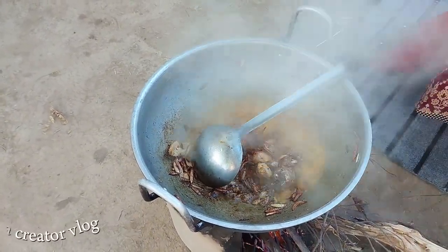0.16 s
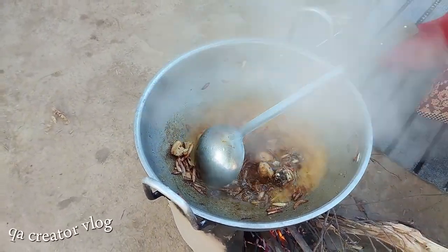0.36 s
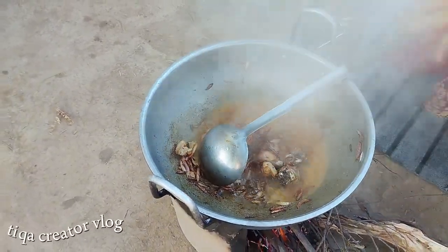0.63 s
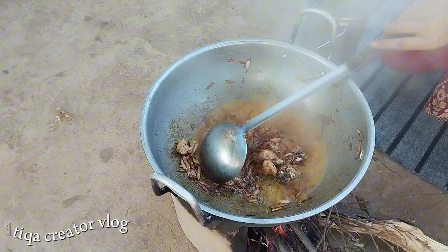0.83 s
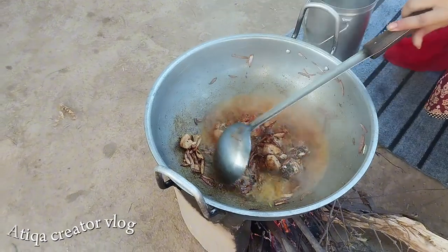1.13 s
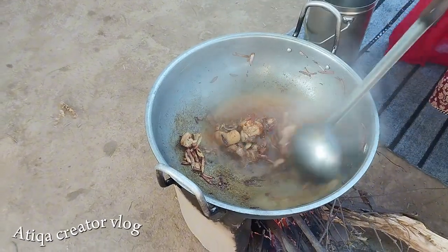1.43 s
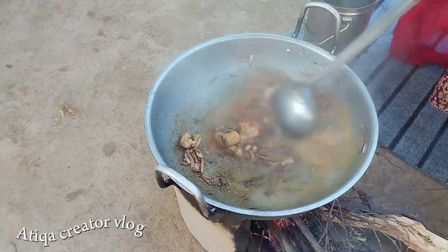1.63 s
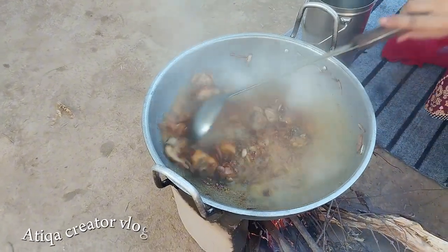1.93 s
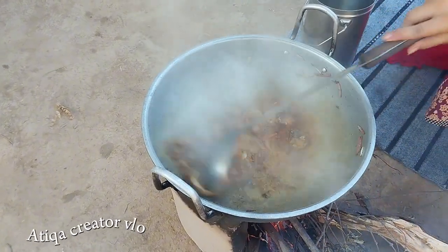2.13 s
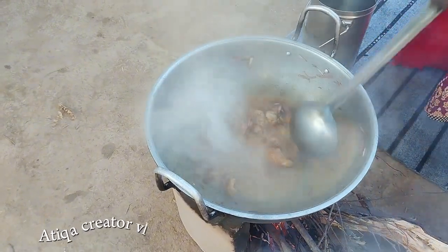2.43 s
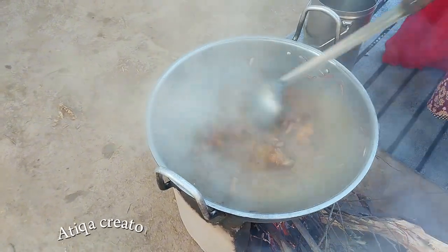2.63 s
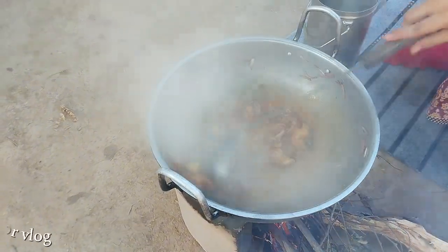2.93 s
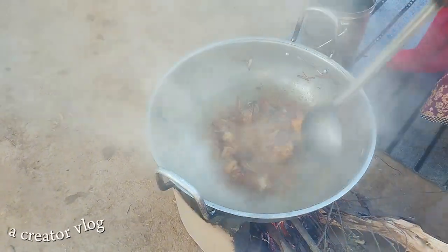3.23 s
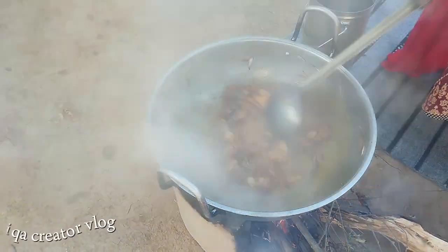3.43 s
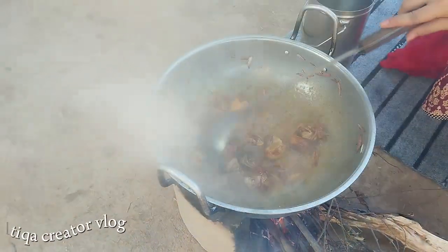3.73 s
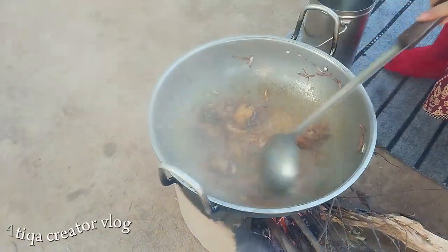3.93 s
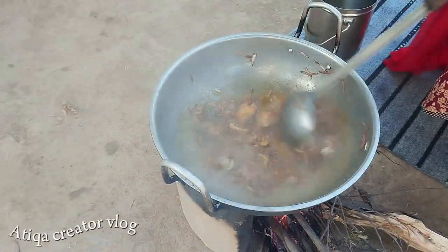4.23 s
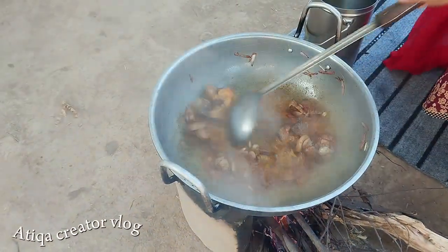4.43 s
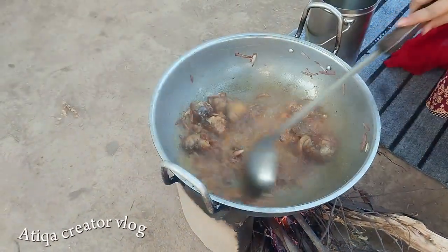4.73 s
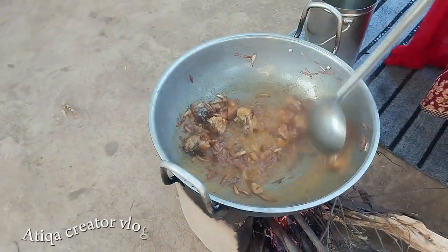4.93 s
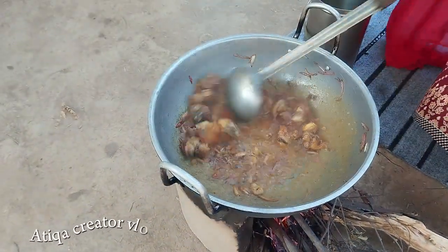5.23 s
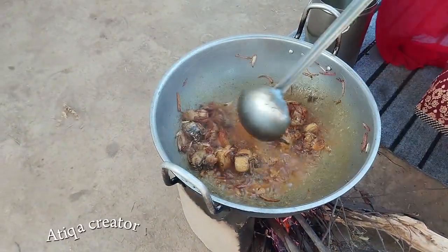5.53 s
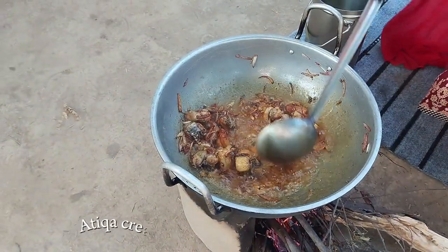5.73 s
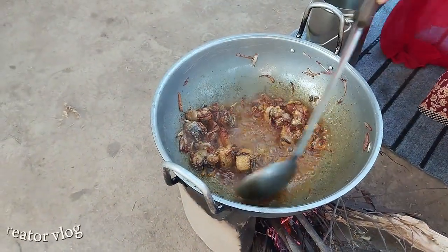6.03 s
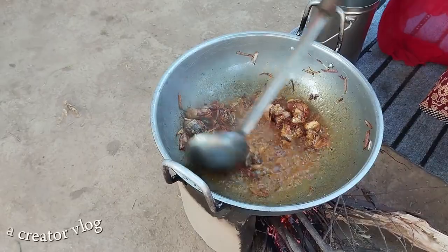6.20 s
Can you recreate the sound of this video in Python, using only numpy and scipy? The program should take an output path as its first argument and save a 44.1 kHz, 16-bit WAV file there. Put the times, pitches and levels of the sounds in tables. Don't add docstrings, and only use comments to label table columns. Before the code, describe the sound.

Loud steamy sizzling in a wide metal pan outdoors, surging with sharp spits, then easing as a ladle scrapes and knocks the pan.

```python
import sys
import numpy as np
from scipy import signal
from scipy.fft import rfft, irfft, next_fast_len
from scipy.io import wavfile
from scipy.ndimage import uniform_filter1d

SR = 44100
rng = np.random.default_rng(int(sys.argv[2]) if len(sys.argv) > 2 else 0)


def to_wav(s):
    ch = np.atleast_2d(s).T
    pcm = np.round(np.clip(ch, -1, 1) * 32767)
    wavfile.write(sys.argv[1], SR, pcm.astype(np.int16))


def natural_amplitude(level_db):
    exponent = np.asarray(level_db, float) / 20
    return 10 ** exponent


N = 280558
EDGE_HZ = 15740

# pitch_hz, width_hz, level_db
PAN = [(285, 50, 6.5), (420, 93, 1.5), (505, 230, 2.5), (730, 100, -7), (1010, 34, -3.5), (1480, 39, -8),
       (1880, 100, -21)]


def evened(x):
    return x / np.sqrt(np.mean(x ** 2) + 1e-20)


def curve(rows, column, t):
    rows = np.asarray(rows)
    return np.interp(t, rows[:, 0], rows[:, column])


def resonate(x, hz, width):
    r = np.exp(-np.pi * width / SR)
    return signal.lfilter([1 - r, 0, r - 1], [1, -2 * r * np.cos(2 * np.pi * hz / SR), r * r], x)


def modes(x, table):
    return sum(natural_amplitude(db) * resonate(x, hz, width) for hz, width, db in table)


def noise(shape, size, patchy_db, flicker_db, band_hz):
    frames = 4 * N // size + 5
    hz = np.fft.rfftfreq(size, 1 / SR)
    a, b, patches = rng.standard_normal((frames, len(hz), 3)).T
    patches = uniform_filter1d(patches, size // 64, 0)
    patches = evened(uniform_filter1d(patches, 8192 // size, 1))
    flicker = evened(uniform_filter1d(rng.standard_normal(frames), size=3))
    shape_hz, shape_db = np.transpose(shape)
    gain = natural_amplitude(np.interp(np.log(hz + 1), np.log(shape_hz + 1), shape_db, -90, -90))
    spectra = (a + 1j * b) * gain[:, None] * natural_amplitude(patchy_db * patches + flicker_db * flicker)
    x = evened(signal.istft(spectra, nperseg=size, noverlap=3 * size // 4)[1][:N])
    inside = (hz > band_hz[0]) & (hz < band_hz[1])
    return x * np.sqrt((gain ** 2).sum() / (gain[inside] ** 2).sum())


def spit(per_s, spread_db, ms):
    strength = natural_amplitude(spread_db * np.minimum(rng.exponential(1, N), 4))
    bursts = strength * (rng.random(N) < per_s / SR)
    return signal.lfilter([1], [1, -np.exp(-1000 / (ms * SR))], bursts)


def surges(t):
    # start_s, swell_s, hold_s, level_db
    flares = [(0.0, 0.021, 0.029, 1.5), (.15, 0.15, .12, 1.5), (.42, .06, .1, 1.7), (0.66, 0.055, 0.1, 4),
              (0.913, 0.15, 0.24, 4), (1.0, 0.11, 0.16, -1), (1.038, 0.11, .01, 3), (1.46, 0.024, 0.052, 3),
              (1.58, .15, .06, 3), (1.87, 0.1, 0.027, 6), (2.04, 0.028, 0.28, 1.5), (2.402, 0.069, 0.35, 4),
              (2.5, .08, 0.19, 1), (2.848, 0.044, 0.18, 3.5), (3.14, 0.17, .1, 2), (3.534, .02, 0.49, 2.5),
              (3.615, .2, .1, 1.5), (5.34, .03, 0.056, 1), (5.683, .06, 0.017, 1), (6.306, .04, .05, 3)]
    settle_s = 0.074
    total_db = 0
    for s, swell, hold, db in flares:
        rise = (t - s) / swell
        fall = 1 + (s + swell + hold - t) / settle_s
        total_db = total_db + db * np.clip(np.minimum(rise, fall), 0, 1)
    return total_db


def boiling(t):
    # pitch_hz, level_db (per Hz)
    fizz_shape = [(1180, -45), (2000, -15), (2850, -2), (3080, -1), (4260, -1), (5100, -0.5), (6740, 0),
                  (7400, -7), (9620, -38), (16300, -120)]
    # pitch_hz, level_db (per Hz)
    bubble_shape = [(88, -58), (150, -6.5), (217, -22.5), (279, -14), (354, -13), (538, -5), (691, -5.5),
                    (779, -9.5), (1020, -3.5), (1140, -4), (1630, -4), (1820, -3), (2120, -3.5),
                    (2600, -1.5), (3380, -37), (5720, -120)]
    # pitch_hz, level_db (per Hz)
    mist_shape = [(6800, 2.5), (7700, 7), (8600, 4.5), (9500, 5), (11400, -1.5), (12900, -6.5), (14000, -4),
                  (15700, 5), (17000, -25)]
    # time_s, heat_db, pool_db
    heat = [(0.0, -31.5, -9.5), (0.9, -33, -10.5), (1.5, -32, -9.5), (1.98, -32, -10.5), (2.06, -32, -14.5),
            (2.4, -34, -11.5), (2.8, -34, -11), (3.3, -34.5, -14), (3.7, -34.5, -11), (4.15, -32.5, -14),
            (4.8, -33.5, -12), (5.6, -37.5, -11.5), (6.36, -41, -9)]
    # middle_s, half_length_s, loss_db
    shades = [
        (0.0, .03, 1),
        (.89, 0.09, 3.5),
        (1.24, .08, 3.5),
        (1.437, .07, 6),
        (1.602, .08, 0),
        (2.401, 0.09, 1),
        (4.65, 0.11, 1.5),
        (3.525, 0.054, 1.5),
        (6.098, .5, 2),
        (6.277, 0.1, 5.5),
    ]
    heat_db, pool_db, flare_db = curve(heat, 1, t), curve(heat, 2, t), surges(t)
    shade_db = sum(db * np.clip(1 - abs(t - s) / half, 0, 1) for s, half, db in shades)

    drops = spit(per_s=98, spread_db=-4.5, ms=1.7)
    fizz = noise(fizz_shape, size=256, patchy_db=0.51, flicker_db=0.38, band_hz=(2500, 9000))
    fizz *= evened(1 + 0.43 * drops)
    low = noise(bubble_shape, size=1024, patchy_db=0.98, flicker_db=-1.05, band_hz=(1100, 2400))
    low *= evened(1 + 0.16 * drops)
    mist = noise(mist_shape, size=256, patchy_db=1.13, flicker_db=0.34, band_hz=(10500, 15500))
    mist *= evened(1 + 0.12 * drops)

    fizz_db = heat_db + flare_db
    low_db = heat_db + pool_db + 0.63 * flare_db
    mist_db = -40.5 + 0.35 * (heat_db - heat[0][1]) + 0.3 * flare_db - shade_db
    mist_db = mist_db - 0.24 * (pool_db - heat[0][2])
    return natural_amplitude(fizz_db) * fizz + natural_amplitude(low_db) * low + natural_amplitude(mist_db) * mist


def bowl(steam):
    # pitch_hz, width_hz, level_db
    pan_tones = [(510, 120, -5.5), (1030, 28, 0), (1859, 27, 5), (2650, 240, -16.5), (3092, 62, 3.5),
                 (3630, 200, -1.5), (4240, 87, 1)]
    return natural_amplitude(-1.13) * (steam + natural_amplitude(-6.0) * modes(steam, pan_tones))


def wind(t):
    # time_s, level_db
    strength = [(0.0, -57), (0.51, -58.5), (1.45, -52), (1.9, -57), (2.69, -54), (3.2, -57.5), (4.3, -50),
                (4.5, -43), (4.78, -36.5), (4.89, -34), (5.17, -36), (6.36, -38)]
    # pitch_hz, level_db (per Hz)
    rumble_shape = [(8.8, -30), (15, 14.5), (43, -5), (88, -7.5), (124, -12), (162, -14.5), (269, -25.5),
                    (400, -27.5), (520, -22), (880, -120)]
    # time_s, peak_db, width_ms, way (push +1 or pull -1)
    lumps = [(4.07, -43, 13, 1), (4.165, -36.5, 11, 1), (4.716, -26.5, 6.2, 1), (4.758, -40.5, 5.8, 1),
             (4.785, -29, 12.5, 1), (4.811, -26.5, 4.3, 1), (4.832, -25.5, 5.6, 1), (4.934, -20.5, 6.1, 1),
             (5.014, -42, 13, 1), (5.058, -40, 12, -1), (5.076, -26, 7.3, 1), (5.111, -29, 9.5, 1),
             (5.216, -28, 11, -1), (5.323, -24.5, 13, -1), (5.43, -28, 15.5, -1), (5.526, -36, 6.7, -1),
             (5.547, -27.5, 8.8, -1), (5.702, -27, 6.3, 1), (5.732, -20, 9.8, 1), (5.912, -26, 14, -1),
             (5.94, -26.5, 11, -1), (6.045, -31, 17, -1), (6.173, -24, 5.5, 1)]
    rumble = noise(rumble_shape, size=4096, patchy_db=0.15, flicker_db=0.0, band_hz=(20, 140))
    out = natural_amplitude(curve(strength, 1, t) + 1.5) * rumble
    for s, db, ms, way in lumps:
        near = slice(round((s - 0.06) * SR), round((s + 0.06) * SR))
        u = (t[near] - s) * 2500 / ms
        out[near] += np.sign(way) * natural_amplitude(db) * (1 - 1.25 * u ** 2) * np.exp(-u ** 2 / 2)
    return out


def spats():
    # time_s, peak_db
    big_drops = [(0.7507, -21), (0.9448, -13), (1.0222, -8), (1.1023, -19), (1.147, -13), (1.477, -21),
                 (1.595, -11), (3.3023, -26), (3.549, -23), (5.371, -16.5), (5.6191, -27), (5.677, -24),
                 (6.067, -17.5)]
    out, t = np.zeros(N + 512), np.arange(512) / SR
    for s, db in big_drops:
        grit = rng.standard_normal(512)
        burst = resonate(grit, 4200, 4100) * np.exp(-t / 0.003)
        out[round(s * SR):][:512] += natural_amplitude(db - 6.5) * burst / abs(burst).max()
    return out[:N]


def wall(force, pitch_hz, focus):
    out = 0
    for hz, width, db in PAN:
        swing = resonate(resonate(force, hz, width), hz, 1.05 * width)
        out = out + natural_amplitude(db - focus * abs(np.log2(hz / pitch_hz))) * swing
    return out


def scraping(t):
    # start_s, length_s, drag_db
    strokes = [
        (1.3, 0.2, -47.5),
        (1.46, .3, -54),
        (1.75, 0.2, -49),
        (1.96, 0.16, -56),
        (4.33, 0.337, -42.5),
        (4.922, .07, -39),
        (5.154, 0.08, -43),
        (5.213, 0.068, -32),
        (5.269, 0.056, -30.5),
        (5.307, 0.16, -35),
    ]
    bite, lift_s, tire_db = 0.16, 0.026, -3.5
    strength = natural_amplitude(2.1 * np.minimum(rng.exponential(1, N), 4))
    slips = strength * (rng.random(N) < 500 / SR) * rng.choice([-1, 1], N)
    push = 0
    for s, length, db in strokes:
        sag_db = tire_db * np.clip((t - s) / length, 0, 1)
        press = np.minimum((t - s) / (bite * length), (s + length - t) / lift_s)
        push = push + natural_amplitude(db + sag_db) * np.clip(press, 0, 1)
    return natural_amplitude(-0.4) * push * evened(wall(slips, 336, focus=4.0))


def blows(rows, tick):
    out, t = np.zeros(N + 4096), np.arange(4096) / SR
    mode_hz, _, mode_db = np.transpose(PAN)
    for (s, db, hz, ms), chance in zip(rows, rng.random((len(rows), 2, 8))):
        tones = np.append(mode_hz, hz) * (0.962 + 0.051 * chance[0])
        tones_db = np.append(mode_db - 10.7 * abs(np.log2(mode_hz / hz)), 1.5)
        ring = natural_amplitude(tones_db) @ np.sin(2 * np.pi * (np.outer(tones, t) + chance[1, :, None]))
        ring *= np.sin(np.pi / 2 * np.minimum(t * 1000 / (0.14 * ms), 1))
        ring *= natural_amplitude(-60 * np.maximum(t - 0.35 * ms / 1000, 0) / 0.043)
        partials = np.sin(2 * np.pi * hz * t)
        partials += 0.9 * np.sin(2 * np.pi * 1.67 * hz * t)
        partials += 0.52 * np.sin(2 * np.pi * 2.33 * hz * t)
        click = np.exp(-t / 0.0011) * np.minimum(t / 0.00048, 1) * partials
        hit = (1 - tick) * ring / abs(ring).max() + tick * click / abs(click).max()
        out[round(s * SR):][:4096] += natural_amplitude(db) * hit
    return out[:N]


def bumps():
    # time_s, level_db, pitch_hz, contact_ms
    soft = [(1.473, -30, 1015, 14), (3.885, -30.5, 325, 4.3), (4.322, -28.5, 285, 13),
            (4.575, -36, 730, 10), (5.395, -36, 1480, 18), (5.449, -31, 500, 8), (4.35, -31, 513, 12),
            (4.364, -25, 300, 25), (4.459, -33, 420, 11), (4.492, -31, 285, 27), (4.572, -31, 338, 12),
            (4.811, -30.5, 410, 2.7), (4.962, -27.5, 770, 22), (4.968, -21.5, 517, 16),
            (5.059, -28, 298, 15), (5.105, -31.5, 596, 8), (5.184, -30, 420, 18), (5.227, -23, 295, 34),
            (5.24, -16, 483, 6.4), (5.244, -20.5, 730, 10), (5.251, -22, 1030, 6.5), (5.280, -15, 1010, 15),
            (5.286, -24, 327, 6), (5.301, -29, 500, 12), (5.363, -28, 1010, 10), (5.395, -27.5, 1010, 45),
            (6.307, -25, 366, 4.3)]
    return blows(soft, tick=0.18)


def knocks():
    # time_s, level_db, pitch_hz, contact_ms
    hard = [
        (3.85, -34, 350, 18),
        (4.341, -18.5, 500, 7.9),
        (4.665, -30, 480, 6),
        (4.801, -28, 446, 2),
        (5.299, -9.5, 564, 4.4),
        (5.337, -21, 450, 4),
        (5.386, -18, 520, 4.5),
        (5.433, -18.5, 483, 1.7),
        (4.601, -31, 600, 4),
    ]
    return blows(hard, tick=0.49)


def clacks():
    # time_s, level_db, pitch_hz, contact_ms
    bare = [
        (5.055, -17, 617, 2.5),
        (5.0552, -27, 1100, 2),
        (5.299, -21, 630, 3),
    ]
    return blows(bare, tick=0.7)


def rim(ladle):
    # pitch_hz, width_hz, level_db
    rim_modes = [(500, 8.1, 1), (1010, 3.6, 8), (1480, 22, -5)]
    return natural_amplitude(-10.5) * modes(ladle, rim_modes)


def scene():
    t = np.arange(N) / SR
    steam = bowl(boiling(t))
    gusts = wind(t)
    ladle = scraping(t) + bumps() + knocks() + clacks()
    return np.tile(steam + ladle + rim(ladle) + gusts + spats(), (2, 1))


def port(x):
    # pitch_hz, reach_hz
    notches = [(9840, 827), (13400, 610)]
    size = next_fast_len(N)
    hz = np.fft.rfftfreq(size, 1 / SR)
    gain = np.prod([np.tanh(abs(hz - f) / reach) ** 1.74 for f, reach in notches], axis=0)
    gain = gain * (hz < 1.02 * EDGE_HZ)
    return irfft(rfft(x, size) * gain, size)[:N]


def coarse_treble(x, waver_db):
    # pitch_hz, limit_db
    holes = [(8000, -13), (9500, -10), (11000, -13), (12000, -10), (12800, -8), (14100, -4), (14800, -7),
             (16000, -10)]
    half, start = 1024, 180
    line = np.arange(368, 800)
    window = signal.windows.kaiser_bessel_derived(2 * half, 4 * np.pi)
    phase = np.outer(np.arange(2 * half) + (1 + half) / 2, line + 0.5)
    basis = window[:, None] * np.cos(np.pi / half * phase)
    padded = np.pad(x, (half - start, 3 * half))
    blocks = padded[:len(padded) // half * half].reshape(-1, half)
    lines = np.hstack([blocks[:-1], blocks[1:]]) @ basis
    hz = (line + 0.5) * SR / (2 * half)

    waver = np.repeat(rng.standard_normal((len(lines), 54)), 8, axis=1)
    level = np.sqrt((lines[:, hz < EDGE_HZ] ** 2).mean(1, keepdims=True)) + 1e-12
    step = level * natural_amplitude(-16)
    least = level * natural_amplitude(np.interp(hz, *np.transpose(holes)) + waver_db * waver)
    kept = np.sign(lines) * step * np.floor(abs(lines) / step + 0.4) * (hz < EDGE_HZ)
    kept *= uniform_filter1d(lines ** 2, size=4, axis=1) > least ** 2

    lost = 2 / half * (lines - kept) @ basis.T
    back = np.zeros_like(blocks)
    back[:-1] += lost[:, :half]
    back[1:] += lost[:, half:]
    return x - back.ravel()[half - start:][:N]


def roll_off(x):
    return signal.sosfilt(signal.butter(12, 17130, fs=SR, output="sos"), x)


def record(dry):
    mono = coarse_treble(port(dry[0]), waver_db=4.5)
    mix = np.tile(mono, (2, 1))
    return roll_off(mix)


dry = scene()
out = record(dry)
to_wav(out)
```